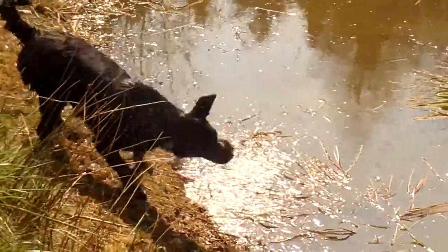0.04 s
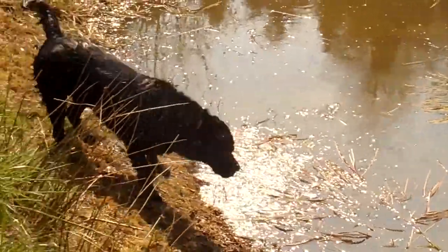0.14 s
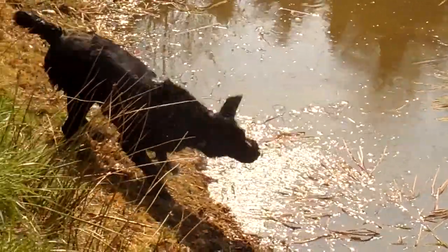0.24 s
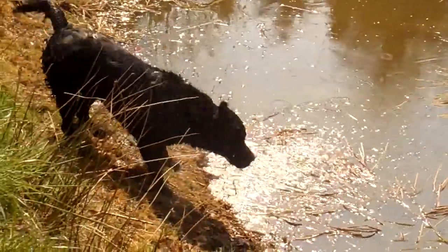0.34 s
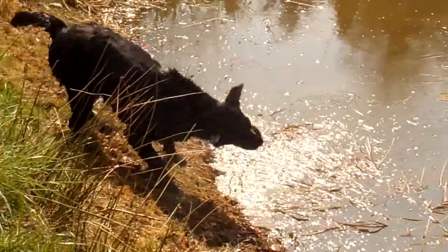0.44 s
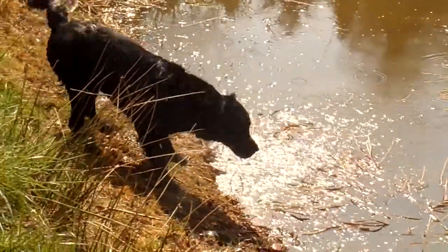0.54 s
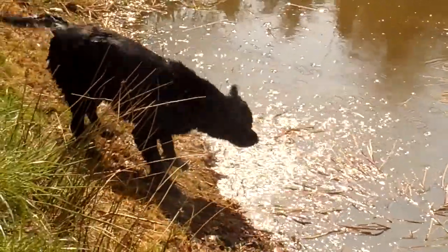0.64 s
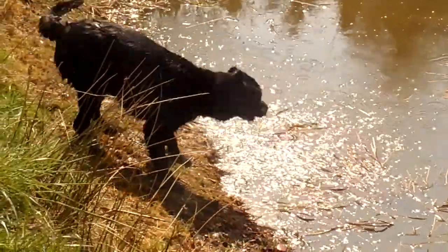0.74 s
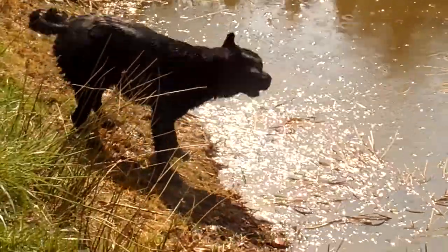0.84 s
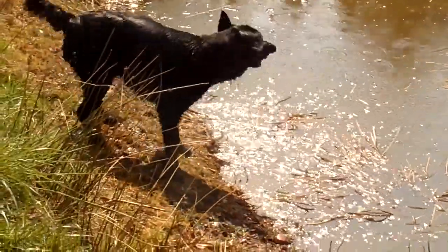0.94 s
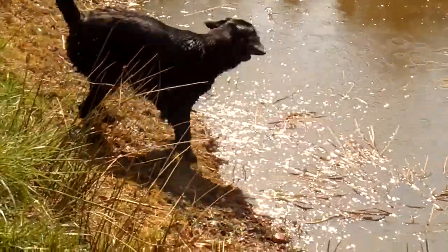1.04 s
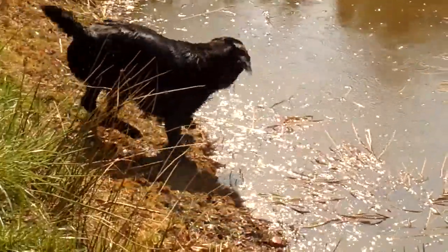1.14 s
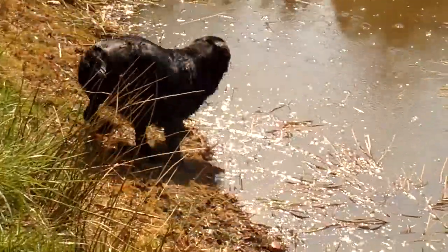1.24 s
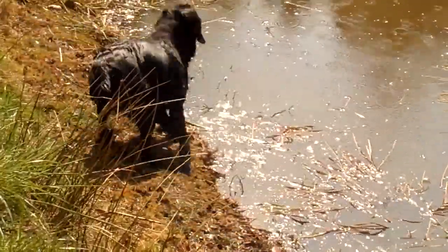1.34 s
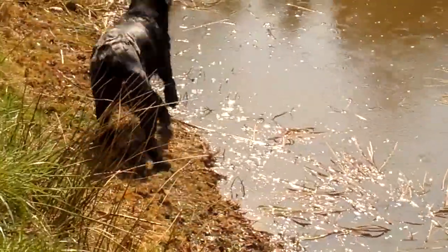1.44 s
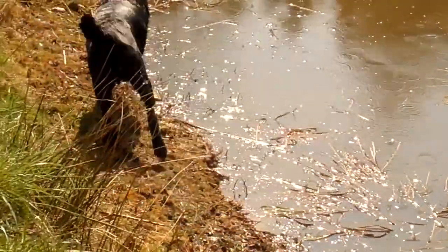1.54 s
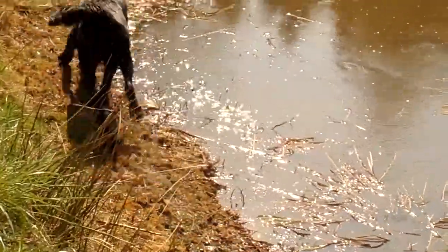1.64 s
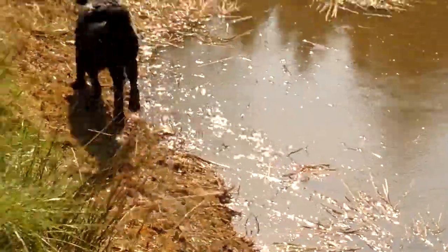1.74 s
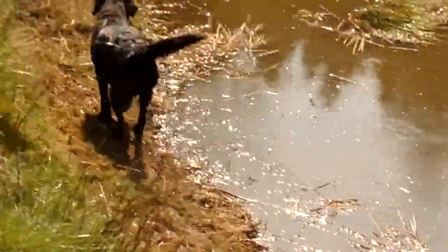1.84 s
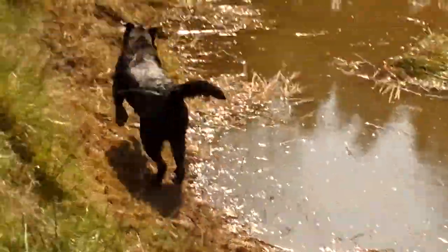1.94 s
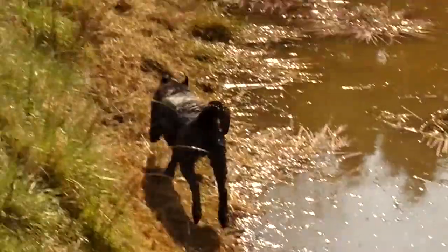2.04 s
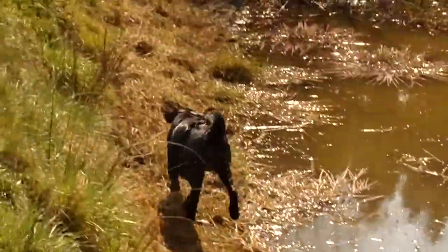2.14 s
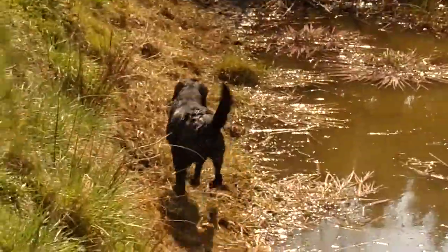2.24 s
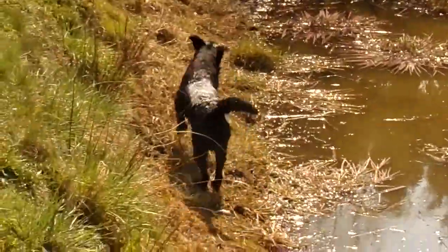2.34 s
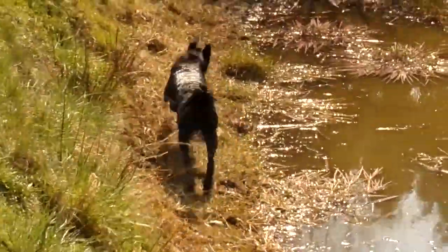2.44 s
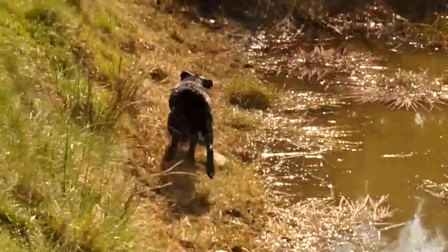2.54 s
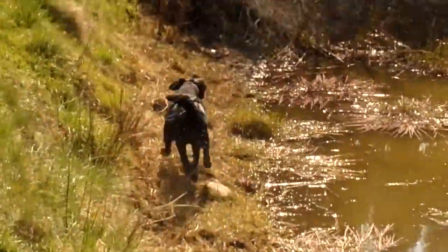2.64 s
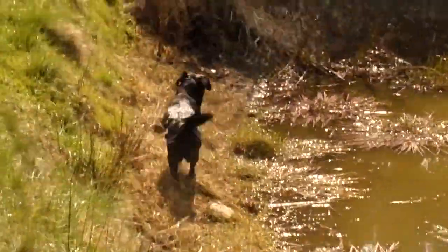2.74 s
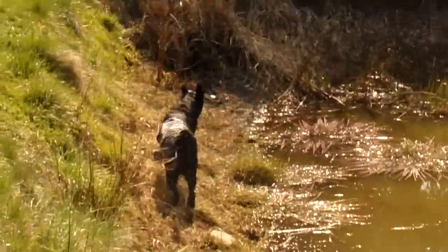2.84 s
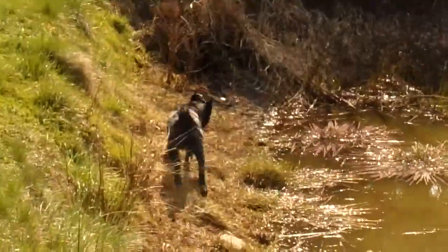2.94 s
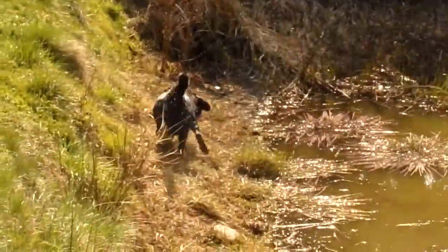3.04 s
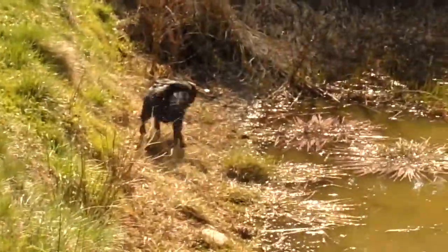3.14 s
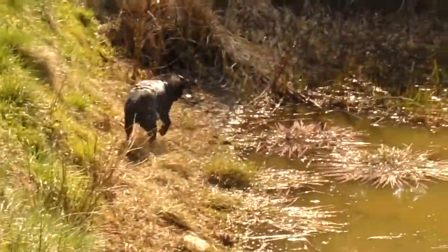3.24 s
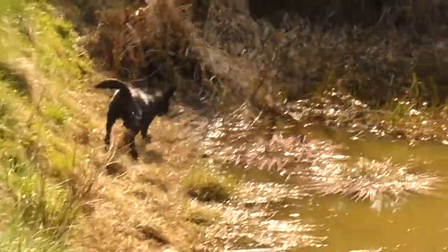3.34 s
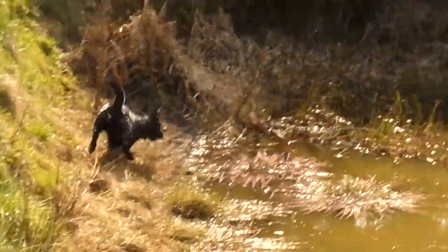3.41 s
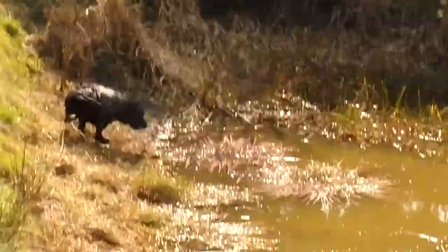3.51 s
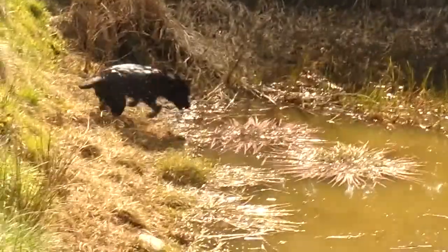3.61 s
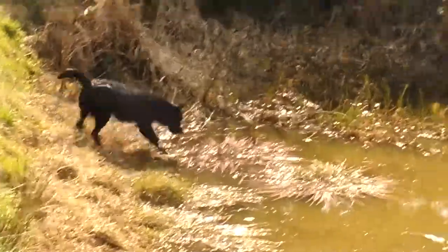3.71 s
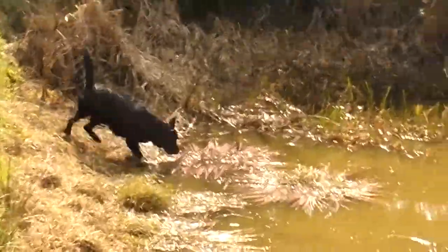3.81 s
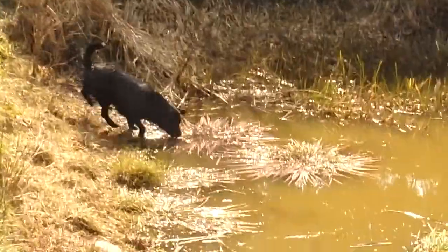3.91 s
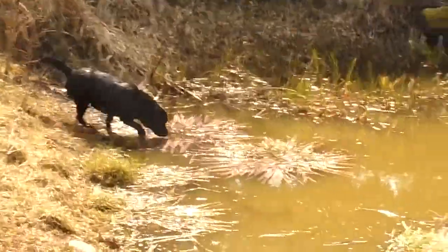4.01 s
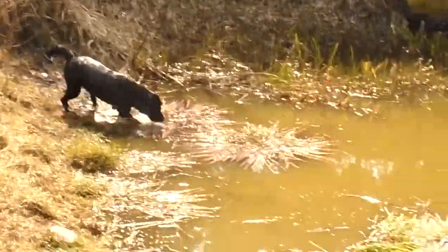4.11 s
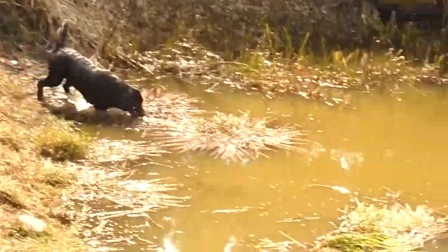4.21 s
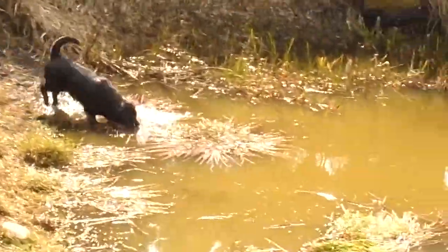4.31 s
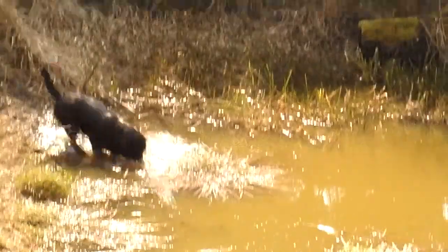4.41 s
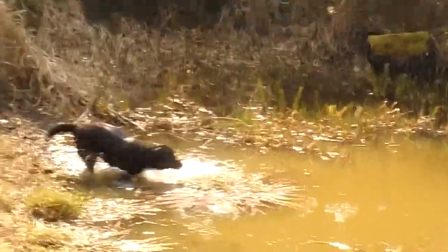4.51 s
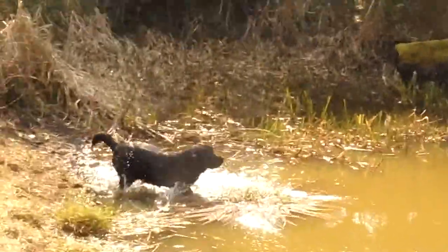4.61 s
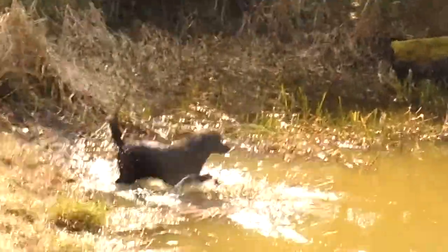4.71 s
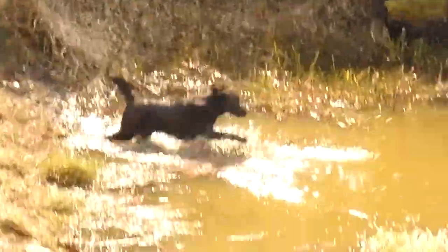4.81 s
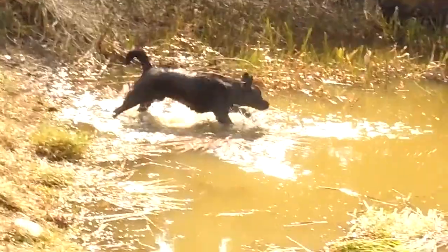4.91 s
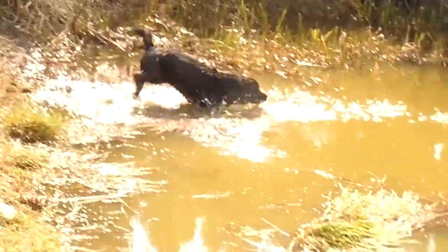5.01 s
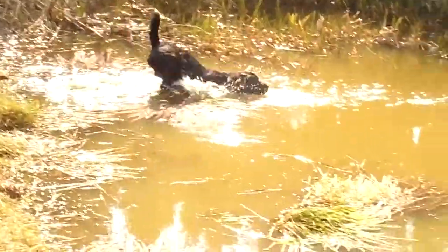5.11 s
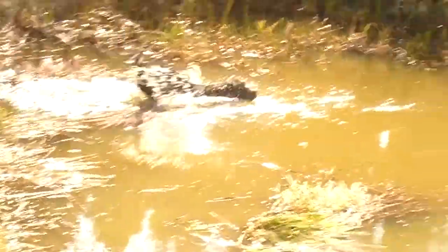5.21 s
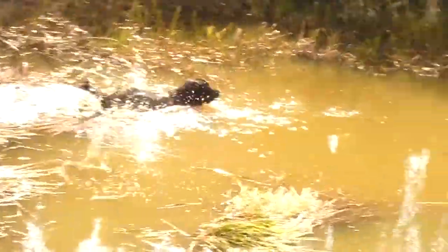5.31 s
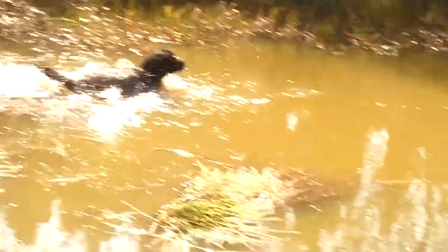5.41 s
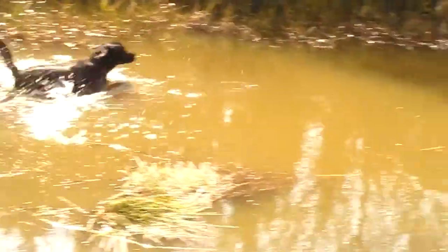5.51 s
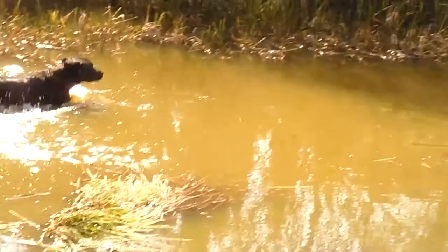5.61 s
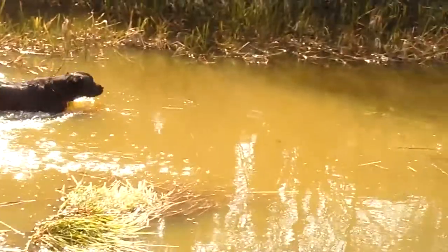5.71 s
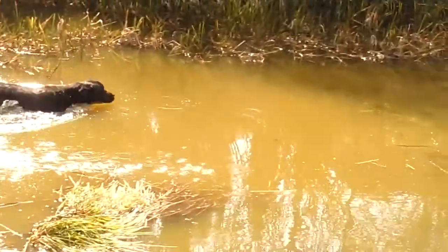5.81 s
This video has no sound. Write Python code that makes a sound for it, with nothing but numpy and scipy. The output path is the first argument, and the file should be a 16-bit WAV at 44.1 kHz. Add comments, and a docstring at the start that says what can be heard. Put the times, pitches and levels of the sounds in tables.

```python
"""Dog plunging into a pond

A dog whines and barks once in pulsed harmonics and breath noise shaped by its throat, and moves through dry
grass before and after the bark in noise bursts and crackle. It hits the water in slaps, ringing bubbles and
sparse spray clicks. Warbling swept tones sing as small birds; squeaks climb in the treble. Filtered noise
makes still air and wind bumping the microphone under a thin high hum. Delays and a scattered tail echo it."""
import sys
import numpy as np
from scipy import signal
from scipy.fft import rfft, irfft, next_fast_len
from scipy.io import wavfile
from scipy.ndimage import uniform_filter1d

SR = 44100
rng = np.random.default_rng(int(sys.argv[2]) if len(sys.argv) > 2 else 0)


def digitize_waveform(pressure):
    """Quantize a signal to 16-bit integers and store it at the path in sys.argv[1].

    Rows of a 2-D input are taken as channels; values are limited to [-1, 1].
    """
    field = np.atleast_2d(pressure).T
    bounded = np.clip(field, -1, 1)
    quanta = np.round(bounded * 32767).astype(np.int16)
    wavfile.write(sys.argv[1], SR, quanta)


N = 258426
TIME = np.arange(N) / SR
EDGE_HZ = 14450  # where the treble is cut

# Still air. Each row: frequency in Hz, relative gain in dB.
AIR_SPECTRUM = [(59, -30), (100, -1.5), (245, -4.5), (314, -8.5), (467, -10), (575, -10), (1320, -14),
                (1630, -10.5), (2520, -15.5), (3170, -15.5), (8260, -25.5), (9170, -25), (9970, -24.5),
                (13600, -27.5), (14500, -24.5)]
AIR_DB = -64.5
# Wind rumble before its loudness is evened out. Each row: frequency in Hz, relative gain in dB.
WIND_SPECTRUM = [(5, 9.5), (14, -3), (28, 4.5), (45, -1.5), (70, -9.5), (110, -21.5), (200, -53.5),
                 (500, -32.5), (1500, -100)]
# Breeze at the microphone. Each row: time in seconds, level in dB.
BREEZE = [(0, -58.5), (.6, -54.5), (1.0, -59.5), (1.4, -54.5), (1.7, -59), (2.3, -58), (3.05, -50),
          (3.9, -57.5), (4.3, -49.5), (5.3, -46.5), (5.6, -55), (5.86, -53.5)]
# Gusts that bump the microphone. Each row: middle in seconds, level in dB, length in seconds.
GUSTS = [(1.421, -49, 0.078), (1.505, -40, 0.067), (2.45, -46.5, 0.059), (2.632, -50, 0.064),
         (3.04, -43.5, 0.077), (3.16, -41, 0.138), (3.4, -44, .07), (3.558, -40.5, 0.057),
         (3.659, -40.5, 0.085), (4.049, -41.5, 0.055), (4.719, -37.5, 0.144), (4.949, -35.5, 0.084),
         (5.042, -39.5, 0.051), (5.142, -43.5, 0.067), (5.71, -42, 0.069)]
# The high hum, before its waver. Each row: time in seconds, pitch in Hz, level in dB.
HUM = [(0, 9510, -81.5), (1.5, 9332, -81.5), (3, 9207, -81.5), (5.86, 9284, -81.5)]
# Squeaks high in the treble. Each row: start in seconds, level in dB before shaping, pitch in Hz.
SQUEAKS = [(0.795, -65.5, 8950), (0.823, -64.5, 9870), (.843, -65.5, 11600), (.875, -71.5, 13800)]

# Bird syllables, before each song's own level and pitch factor.
# Each row: seconds from the start, pitch in Hz, relative level in dB.
FALL = [(0, 4050, -20.5), (.011, 4325, -12), (.019, 3849, -6.5), (.028, 3399, 1), (.036, 3080, -6),
        (.041, 2757, -25)]
FALL_UPPER = [(.026, 4455, -21.5), (.036, 4005, -9), (.046, 3650, -15.5)]  # the same bird's second voice
RISE = [(0, 2247, -10), (.013, 2599, 0.5), (.025, 3003, -4.5), (.036, 3717, -12), (.044, 3000, -20.5),
        (.054, 2242, -17.5)]
TSIP = [(0, 3747, -14.5), (.016, 3384, -1.5), (.025, 3170, -0.5), (.035, 2892, -18)]  # a faint falling tsip
SLUR = [(0, 4100, -10.5), (.022, 3150, 1), (.05, 2550, 1), (.072, 2230, -14)]  # a long downslur
FLOURISH = [
    [(0, 5060, -14), (.032, 5854, -7.5), (.04, 6010, -16)],
    [(.04, 3998, -16.5), (.048, 4407, 2), (.058, 5500, -1), (.063, 4000, 2), (.078, 3004, -15)],
    [(.105, 2880, -19.5), (.127, 3330, 3.5), (.143, 3480, 3.5), (.155, 3050, -8), (.19, 2468, -10.5)],
]  # three such tables: an upslur, a sharp peak and a low arch
# Trill rules. In order: start in seconds, first beat in seconds, seconds added to each next beat
# (negative shrinks it), level in dB, dB added per syllable, pitch factor.
FALL_TRILL = (0.5125, 0.05, 0.004, -54, 0.1982, 1.0134)
RISE_TRILL = (1.57, 0.01, -0.01, -60, 0.03, 1.02)
TSIP_TRILL = (2, 0.21, 0.02, -66.5, -0.1, .975)
# Single calls, flourishes and downslurs. Each row: start in seconds, level in dB, pitch factor.
FALL_CALLS = [(3.889, -67, 1.27), (4.025, -63, 1.3), (4.168, -62.5, 1.22)]
RISE_CALLS = [(2.006, -67, 1.2), (4.538, -62, 1.3)]
TSIP_CALLS = [(2.652, -67.5, 0.976), (2.728, -67.5, 1)]
FLOURISHES = [(.912, -55, 0.973), (3.012, -53.5, 0.9866), (4.3, -57, 0.981)]
SLURS = [(0.632, -60, 0.995), (1.045, -64, 1.004), (4.068, -68.5, 1.2)]
# Long whistles, one table each, before their warble. Each row: time in seconds, pitch in Hz, level in dB.
WHISTLES = [
    [(1.605, 4290, -62.5), (1.628, 4212, -59.5), (1.648, 4372, -56), (1.71, 4460, -53), (1.765, 4313, -58),
     (1.802, 4307, -51.5), (1.835, 4102, -70)],
    [(2.67, 4070, -75), (2.705, 3920, -66), (2.77, 3910, -69), (2.85, 3999, -62.5), (2.92, 4164, -61.5),
     (2.99, 4190, -49), (3.04, 4249, -62), (3.11, 4206, -62), (3.15, 4164, -74)],
    [(4.84, 3810, -67.5), (4.892, 3786, -63), (4.98, 3853, -59.5), (5.042, 3911, -48.5),
     (5.084, 4067, -59.5), (5.126, 4327, -56.5), (5.145, 4250, -57.5)],
]
# Octave above each whistle. Each entry: level in dB before its swell.
OCTAVE_DB = [-86.5, -72.5, -80]

# Paws landing and scuffing on the bank.
# Each row: start in seconds, peak in dB, ring in Hz, 60 dB decay in seconds.
PAWS = [(.131, -47, 400, 0.0328), (.175, -50, 260, 0.102), (.233, -55.5, 400, .04),
        (.329, -52.5, 245.4, .06), (.603, -36, 349.5, 0.074), (.612, -38, 144.7, 0.121),
        (.733, -44, 299, 0.0575), (1.41, -56.5, 996, 0.33), (1.539, -54, 1203, 0.413),
        (1.713, -65, 220, 0.057), (1.838, -45, 347, 0.0246), (1.859, -52, 474, 0.216),
        (2.23, -59.5, 680, 0.164), (2.885, -51, 240, 0.034), (2.935, -49.5, 225.5, 0.031),
        (2.936, -51, 800, 0.057), (3.6, -57, 650, 0.32)]
# Dry stalks snapping and crunching.
# Each row: start in seconds, peak of the crunch in dB, centre in Hz, 60 dB decay in seconds.
SNAPS = [(.032, -45, 2680, 0.0354), (.133, -47.5, 2840, 0.032), (0.2333, -44, 2080, 0.052),
         (0.3148, -44, 4700, 0.0048), (.537, -50.5, 7000, 0.0088), (0.631, -46.5, 2810, 0.088),
         (.735, -47, 3002, 0.046), (0.849, -37, 1985, 0.0141), (1.839, -47.5, 2800, 0.013),
         (2.499, -53, 5000, 0.0118), (2.85, -51, 6950, 0.218), (3.348, -55.5, 7000, 0.095),
         (3.71, -57, 2100, 0.21), (3.88, -54.5, 2707, 0.0196)]
SNAP_TICK_DB = -13.5  # the stalk's bright tick, against its crunch
# Legs and body swishing through grass.
# Each row: middle in seconds, level in dB before the brush trim, length in seconds.
SWISHES = [(1.381, -66, 0.223), (1.599, -71.5, .14), (1.891, -61.5, 0.153), (2.07, -63.5, .17),
           (2.23, -67.5, .09), (2.329, -67.5, 0.083), (2.511, -64.5, .07), (2.93, -68, 0.097),
           (3.173, -65, 0.202), (3.473, -58.5, 0.42), (3.729, -56.5, .2)]
# Grass crackle. Each row: frequency in Hz, relative gain in dB.
GRASS_SPECTRUM = [(88, -45), (150, -25), (171, -60), (246, 2.5), (395, -4), (1280, -20), (1580, -9),
                  (2060, -7.5), (3250, -43.5), (4320, -21), (5520, -23), (8880, -32.5), (14000, -31.5)]

# Slaps and gulps of water. Each row: start in seconds, peak in dB, cavity in Hz,
# 60 dB decay in seconds, thrown spray in dB against that peak.
SPLASHES = [(4.232, -57, 700, 0.103, 4), (4.393, -48, 1404, 0.072, -6), (4.582, -44.5, 896, 0.034, 1),
            (4.672, -45, 647, 0.0375, -10), (4.904, -40, 1040, 0.169, -15), (5.025, -55, 1700, 0.034, 16.5),
            (5.1743, -36, 855, 0.063, -10), (5.197, -36.5, 778, 0.062, -9),
            (5.268, -41.5, 224.7, .05, -7.5), (5.31, -33, 860, 0.0163, 2), (5.384, -43.5, 453, .1, -18.5),
            (5.426, -45, 786, 0.033, -4.5), (5.46, -31.5, 281, 0.0375, -30.5),
            (5.558, -39.5, 828, 0.0176, -20), (5.59, -46, 190, .13, -22.5), (5.642, -44.5, 830, 0.051, -9),
            (5.672, -48.5, 180, 0.067, -10), (5.765, -45.5, 693, 0.144, -3.5),
            (5.785, -45.5, 178.7, 0.079, -8)]
# The dog stirring the water as it wades, lunges and swims.
# Each row: time in seconds, slosh in dB and spray in dB, both before the water trims.
CHURN = [(4.2, -76.5, -66), (4.28, -63.5, -68.5), (4.44, -60.5, -60), (4.545, -71.5, -76.5),
         (4.585, -53, -61), (4.74, -54, -65.5), (4.92, -53.5, -59.5), (5.0, -61.5, -63), (5.13, -56, -54.5),
         (5.165, -53.5, -60.5), (5.2, -50, -53), (5.24, -61.5, -62.5), (5.47, -46, -57), (5.56, -58, -72.5),
         (5.7, -59.5, -62), (5.86, -52, -60)]
# Filter on the bubbles. Each row: frequency in Hz, relative gain in dB.
SLOSH_SPECTRUM = [(90, 12), (150, -2.5), (240, 3.5), (350, 4.5), (480, -4), (850, 7), (1100, -0.5),
                  (1400, -7.5), (1800, -1), (2300, -12.5), (3600, -8), (6000, -25)]
# Filter on mist and drops. Each row: frequency in Hz, relative gain in dB.
SPRAY_SPECTRUM = [(900, -22), (1800, 3.5), (3000, 9), (4500, 4), (6500, -3), (9000, -7), (14000, -13)]
# Wake behind every splash: slosh and spray gains in dB, build and 60 dB decay times in seconds.
WAKE_SLOSH_DB, WAKE_SPRAY_DB, WAKE_RISE_S, WAKE_T60 = -16.5, -21.5, 0.0086, 0.153

# The whine, before its waver. Each row: time in seconds, pitch in Hz, level in dB.
WHINE = [(0, 483.4, -49), (.03, 495.7, -56.5), (.06, 474.7, -55), (.1, 507.1, -59.5), (.125, 511.3, -63),
         (.145, 421, -73)]
# Harmonics of the whine. Each row: multiple of the pitch, relative level in dB.
WHINE_PARTIALS = [(1, -16), (2, 0), (3, -1), (4, -14)]
# The bark's pitch, before jitter. Each row: time in seconds, pitch in Hz, roughness from 0 to 1.
BARK_PITCH = [(0.381, 320.1, 0.22), (.408, 356.4, 0.42), (.42, 500.4, 0.53), (0.435, 522.8, 0.66),
              (.451, 620.6, 0.42), (.47, 568.1, 0.64), (.485, 511.7, 0.74), (.5, 433, 0.56),
              (0.532, 330.2, 0)]
# The bark's push. Each row: time in seconds, effort in dB, mouth opening from 0 to 1.
BARK_EFFORT = [(.382, -51, 0.01), (.39, -52, 0.09), (.405, -36, 0.39), (.425, -38, 0.8), (.447, -31, 0.79),
               (.49, -33.5, 0.97), (.505, -32.5, 0.54), (.535, -43.5, 0.24)]
# Throat with the mouth open. Each row: frequency in Hz, relative gain in dB.
THROAT = [(150, -18), (350, -17.5), (650, 5.5), (800, -8.5), (1080, 4.5), (1280, -2), (1530, 6),
          (1780, -1.5), (2050, 0.5), (2500, -18.5), (3100, -27), (4700, -20.5), (6400, -26), (8000, -36),
          (13000, -47)]

# First reflections off water and bank. Each row: delay in seconds, level against the direct sound in dB.
REFLECTIONS = [(.0037, -13), (.0094, -19), (0.0161, -20), (.024, -13)]
# Echo decay. Each row: frequency in Hz, 60 dB decay in seconds.
ECHO_T60 = [(200, 1), (600, 0.8), (1500, 0.925), (4000, 1), (12000, 0.1826)]
# Echo tone. Each row: frequency in Hz, relative gain in dB.
ECHO_COLOUR = [(150, -8.5), (600, -0.5), (1100, 5.5), (1800, 5), (4000, 1), (12000, 12)]


def amp(db):
    """Turns decibels into gain."""
    return 10 ** (np.asarray(db) / 20)


def unit(x):
    """Scales to rms 1."""
    return x / np.sqrt(np.mean(x ** 2) + 1e-20)


def read(points, hz):
    """Reads a spectrum on a log-frequency axis."""
    f, value = np.transpose(points)
    return np.interp(np.log(hz + 1), np.log(f + 1), value)


def follow(rows):
    """Gives sample times over a curve's span, then each of its columns."""
    s, *columns = np.transpose(rows)
    t = np.arange(s[0], s[-1], 1 / SR)
    return [t] + [np.interp(t, s, c) for c in columns]


def add(mix, s, sound):
    """Drops a sound into the mix at time s."""
    part = mix[max(round(s * SR), 0):][:len(sound)]
    part += sound[:len(part)]


def colour(x, spectrum):
    """Filters x through a spectrum, at rms 1."""
    size = next_fast_len(len(x) + 2048)
    gain = amp(read(spectrum, np.fft.rfftfreq(size, 1 / SR)))
    return unit(irfft(rfft(x, size) * gain, size)[:len(x)])


def drift(size, hz):
    """Wanders smoothly at random, up to about a rate in Hz, at rms 1."""
    f = np.fft.rfftfreq(size, 1 / SR)
    return unit(irfft(rfft(rng.standard_normal(size)) / (1 + (f / hz) ** 4), size))


def fade(x, order=400):
    """Softens both ends over a number of samples."""
    i = np.arange(len(x))
    return x * np.minimum(np.minimum(i, i[::-1]) / order, 1)


def swell(s, length_s):
    """Rises and falls smoothly to height 1 around time s."""
    return np.cos(np.pi * np.clip((TIME - s) / length_s, -.5, .5))


def burst(hz, t60, spread, soft=0.0126):
    """A dying burst of noise around one frequency, at peak 1; long ones start more softly."""
    t = np.arange(int((t60 + .01) * SR)) / SR
    ratio = 1 + abs(spread)
    edges = [hz / ratio, min(hz * ratio, SR / 2 - SR / 20)]
    band = signal.butter(2, edges, "band", fs=SR, output="sos")
    envelope = amp(-60 * t / t60) * (1 - np.exp(-t / (soft * t60)))
    x = signal.sosfilt(band, rng.standard_normal(len(t)) * envelope)
    return x / abs(x).max()


def grains(size, per_s, spread_db):
    """Sparse clicks of random sign, a few of them large."""
    heights = amp(spread_db * np.minimum(rng.exponential(1, size), 4)) * rng.choice([-1, 1], size)
    return heights * (rng.random(size) < per_s / SR)


def ambience(hum_waver=0.009, hum_sway=.008):
    """Steady noise for still air, evened rumble ridden by breeze and gusts, and a fuzzy wavering hum."""
    out = amp(AIR_DB) * colour(rng.standard_normal(N), AIR_SPECTRUM)
    breeze = amp(np.interp(TIME, *np.transpose(BREEZE)))
    gusts = sum(amp(db) * swell(s, length) for s, db, length in GUSTS)
    buffet = colour(rng.standard_normal(N), WIND_SPECTRUM)
    # even out the rumble so the curves set its loudness
    buffet /= np.sqrt(uniform_filter1d(buffet ** 2, size=3000) + 0.034)
    out += fade(np.hypot(breeze, gusts) * buffet)
    t, hz, db = follow(HUM)
    waver = hum_waver * drift(len(t), 253) + hum_sway * drift(len(t), 30)
    turns = np.cumsum(hz * (1 + waver)) / SR
    add(out, t[0], amp(db) * unit(np.sin(2 * np.pi * turns)))
    return out


def squeaks(length_s=0.049):
    """A quick climbing run of very high tones, made fuzzy by random amplitude."""
    out, t = np.zeros(N), np.arange(int(length_s * SR)) / SR
    for s, db, hz in SQUEAKS:
        fuzz = np.hanning(len(t)) * drift(len(t), 220)
        add(out, s, amp(db) * fuzz * np.sin(2 * np.pi * hz * t))
    return out


def trill(rule, count):
    """Repeats a syllable on a steadily changing beat: rows of start s, level dB and pitch factor."""
    start, beat, stretch, db, swell_db, factor = rule
    return [(start + k * beat + stretch * k * (k - 1) / 2, db + k * swell_db, factor) for k in range(count)]


def sing(shape, song, warble):
    """Sings one swept, warbling tone at each row of a song."""
    out = np.zeros(N)
    t, hz, db = follow(shape)
    for s, level_db, factor in song:
        turns = np.cumsum(hz * factor * (1 + warble * drift(len(t), 250))) / SR
        note = amp(db + level_db) * np.sin(2 * np.pi * turns)
        add(out, s + t[0], fade(note, order=60))
    return out


def whistles():
    """Long, slowly bending tones, each with a quiet octave that swells in the middle."""
    out = np.zeros(N)
    for rows, octave_db in zip(WHISTLES, OCTAVE_DB):
        t, hz, db = follow(rows)
        phase = 2 * np.pi * np.cumsum(hz * (1 + 0.0031 * drift(len(t), 120))) / SR
        octave = amp(octave_db) * np.hanning(len(t)) * unit(np.sin(2 * phase))
        add(out, t[0], fade(amp(db) * unit(np.sin(phase)) + octave, order=1000))
    return out


def birds(trill_warble=0.0082, flourish_warble=0.0298):
    """Nearly pure tones: quick swept syllables and calls, a buzzier flourish, and long whistles."""
    falls = trill(FALL_TRILL, count=12) + FALL_CALLS
    rises = trill(RISE_TRILL, count=8) + RISE_CALLS
    tsips = trill(TSIP_TRILL, count=8) + TSIP_CALLS
    songs = (FALL, falls), (FALL_UPPER, falls), (RISE, rises), (TSIP, tsips), (SLUR, SLURS)
    out = sum(sing(shape, song, trill_warble) for shape, song in songs)
    out += sum(sing(note, FLOURISHES, flourish_warble) for note in FLOURISH)
    return out + whistles()


def steps(brush_db=-4):
    """Paws thud and stalks snap as noise bursts; grass crackles against the legs as sparse clicks."""
    out = np.zeros(N)
    for s, db, hz, t60 in PAWS:
        add(out, s, amp(db) * burst(hz, t60, spread=0.497))
    for s, db, hz, t60 in SNAPS:
        add(out, s, amp(db) * burst(hz, t60, spread=0.823))
        add(out, s, amp(db + SNAP_TICK_DB) * burst(8900, 0.0177, spread=0.68))
    brushing = sum(amp(db + brush_db) * swell(s, length) for s, db, length in SWISHES)
    return out + brushing * colour(grains(N, per_s=1800, spread_db=4.0), GRASS_SPECTRUM)


def bubbles(size, per_s, cycles, glide, count=40):
    """Air pockets of many sizes ring for a few cycles and rise in pitch."""
    out = np.zeros(size)
    for hz in np.geomspace(140, 5000, count):
        life = cycles / hz
        t = np.arange(int(5 * life * SR)) / SR
        ring = np.sin(2 * np.pi * hz * t * (1 + glide * t / life)) * np.exp(-t / life)
        # small, high bubbles come more often
        births = grains(size, per_s / count * np.sqrt(hz / 1000), spread_db=2.0)
        out += signal.oaconvolve(births, ring)[:size] * hz ** 0.65
    return out


def wake(t):
    """Agitation left by the splashes: each builds quickly and dies away."""
    out = np.zeros(len(t))
    for s, db, *_ in SPLASHES:
        age = np.maximum(t - s, 0)
        out += amp(db - 60 * age / WAKE_T60) * (1 - np.exp(-age / WAKE_RISE_S))
    return out


def water(slosh_db=-1, mist_db=-1.0, droplet_db=-3.5):
    """Stirring rings bubbles and throws mist and drops; each plunge adds a cavity burst and bright spray."""
    out = np.zeros(N)
    t, stir_db, fizz_db = follow(CHURN)
    stirred = wake(t)
    slosh = np.hypot(amp(stir_db + slosh_db), amp(WAKE_SLOSH_DB) * stirred)
    spray = np.hypot(amp(fizz_db), amp(WAKE_SPRAY_DB) * stirred)
    body = colour(bubbles(len(t), per_s=1700, cycles=5.07, glide=0.0429), SLOSH_SPECTRUM)
    flicker = amp(2.68 * drift(len(t), 48.3))
    mist = colour(grains(len(t), per_s=2400, spread_db=0.5), SPRAY_SPECTRUM) * flicker
    drops = colour(grains(len(t), per_s=160, spread_db=4), SPRAY_SPECTRUM)
    fizz = amp(mist_db) * mist + amp(droplet_db) * drops
    add(out, t[0], fade(slosh * body + spray * fizz))
    for s, db, hz, t60, thrown_db in SPLASHES:
        add(out, s, amp(db) * burst(hz, t60, spread=0.322))
        add(out, s, amp(db + thrown_db) * burst(2726, t60, spread=2.22))
    return out


def whine(jitter=0.0647):
    """A thin wavering note through the nose, built from a few harmonics."""
    t, hz, db = follow(WHINE)
    turns = np.cumsum(hz * (1 + jitter * drift(len(t), 371))) / SR
    note = sum(amp(level) * np.sin(2 * np.pi * round(k) * turns) for k, level in WHINE_PARTIALS)
    out = np.zeros(N)
    add(out, t[0], fade(amp(db) * unit(note)))
    return out


def bark(jitter=.05, shut_hz=650, fundamental_db=1):
    """Uneven pulses and puffs of breath pass a throat that brightens as the jaw opens."""
    t, effort_db, mouth = follow(BARK_EFFORT)
    s, pitch, roughness = np.transpose(BARK_PITCH)
    hz, rough = np.interp(t, s, pitch), np.clip(np.interp(t, s, roughness), 0, 1)
    turns = np.cumsum(hz * (1 + jitter * drift(len(t), 360))) / SR
    # harmonics with staggered phases form the pulses; breath puffs once per pulse
    folds = unit(sum(np.cos(2 * np.pi * k * turns - np.log(k) * np.pi * 2) for k in range(1, 20)))
    puffs = unit((0.45 + np.exp(-(turns % 1) / 0.25)) * rng.standard_normal(len(t)))
    voice = (1 - rough) * colour(folds, THROAT) + rough * colour(puffs, THROAT)
    voice = voice / np.hypot(1 - rough, rough)  # steady power at any roughness
    voice += 0.235 * amp(fundamental_db) * np.cos(2 * np.pi * turns)
    muffled = unit(signal.sosfilt(signal.butter(2, shut_hz, fs=SR, output="sos"), voice))
    mouth = np.clip(mouth, 0, 1)
    jaw_mix = mouth * unit(voice) + (1 - mouth) * muffled
    out = np.zeros(N)
    add(out, t[0], fade(amp(effort_db) * jaw_mix, order=100))
    return out


def reflect(x):
    """Adds delayed copies off water and bank, scaled to roughly keep the power."""
    out = x.copy()
    for delay, db in REFLECTIONS:
        add(out, delay, amp(db) * x)
    return out / np.sqrt(1 + sum(amp(db) ** 2 for delay, db in REFLECTIONS))


def banks(x, build_s=0.027):
    """Scattered echoes from banks and trees swell briefly, then die band by band."""
    taps = grains(SR, per_s=2000, spread_db=4)
    hz, t, z = signal.stft(taps, SR, nperseg=256)
    decay_db = -60 * t / read(ECHO_T60, hz)[:, None]
    z = z * amp(read(ECHO_COLOUR, hz)[:, None] + decay_db) * (1 - np.exp(-t / build_s))
    tail = signal.istft(z, SR, nperseg=256)[1]
    return signal.fftconvolve(x, tail / np.linalg.norm(tail))[:N]


def scene():
    """Mixes all layers; dog, birds, steps and water each send their share to the echo."""
    voice, song = reflect(bark() + whine()), reflect(birds())
    feet, pond = steps(), water()
    echo = banks(amp(-10.0) * voice + amp(-15.5) * song + amp(-8.0) * feet + amp(-12) * pond)
    return (voice + song + feet + pond + echo + squeaks() + ambience())[None]


def record(dry):
    """Cuts the treble above EDGE_HZ with a steep linear-phase filter."""
    lowpass = signal.firwin(511, EDGE_HZ, window=("kaiser", 9), fs=SR)
    return signal.oaconvolve(dry, lowpass[None], "same")


dry = scene()
out = record(dry)
digitize_waveform(out)
```